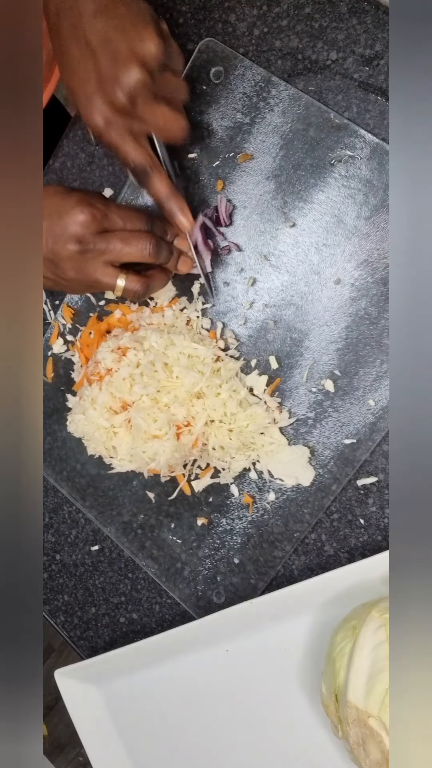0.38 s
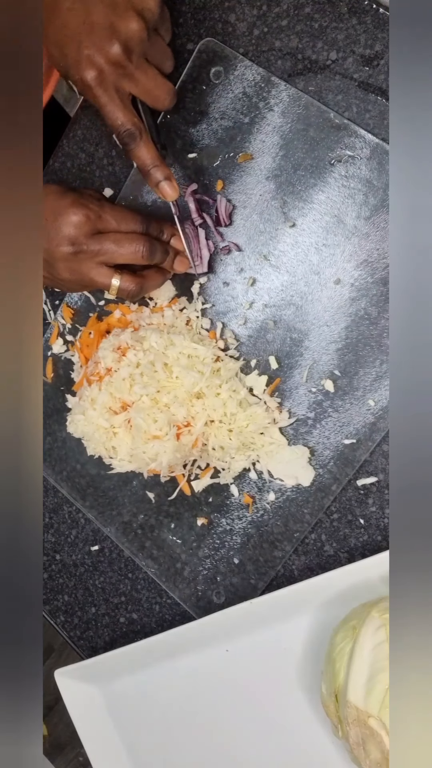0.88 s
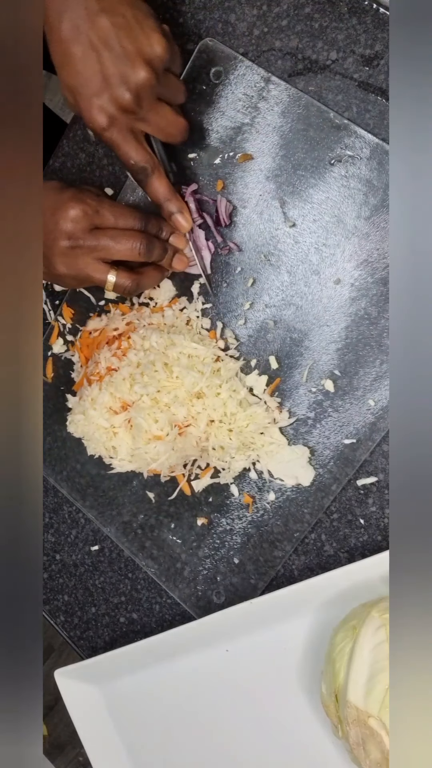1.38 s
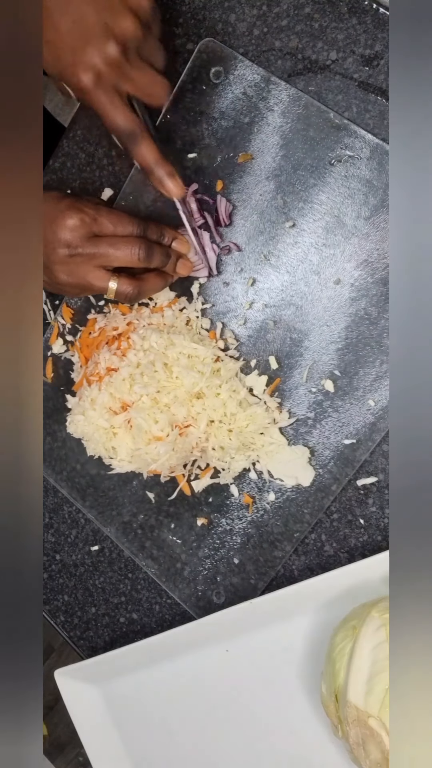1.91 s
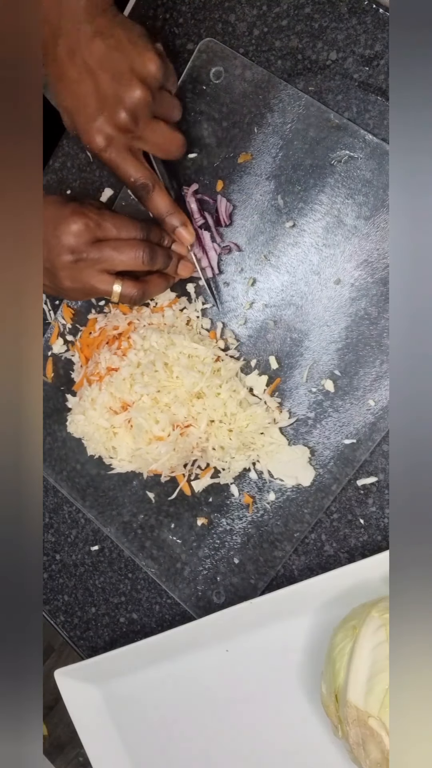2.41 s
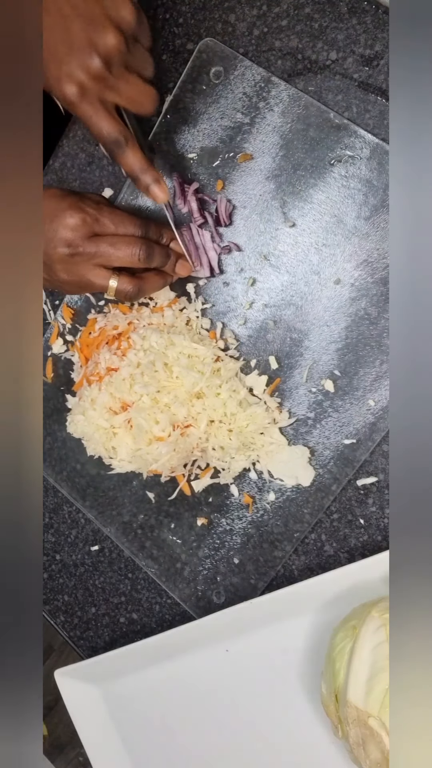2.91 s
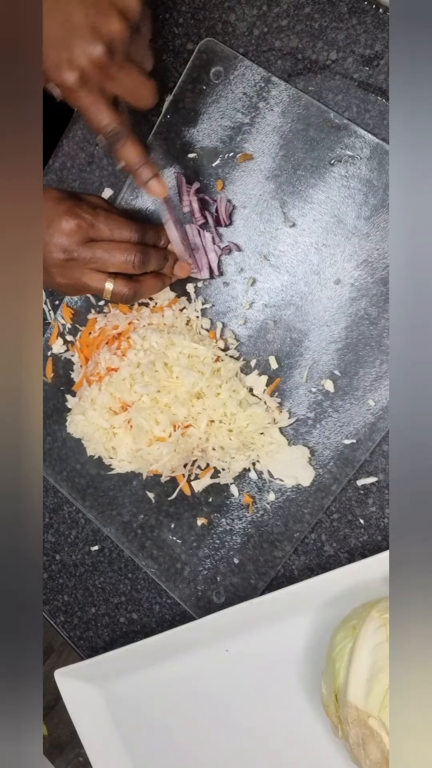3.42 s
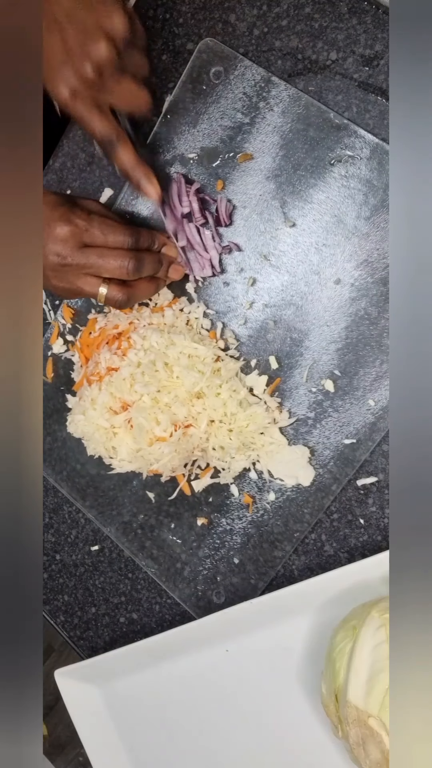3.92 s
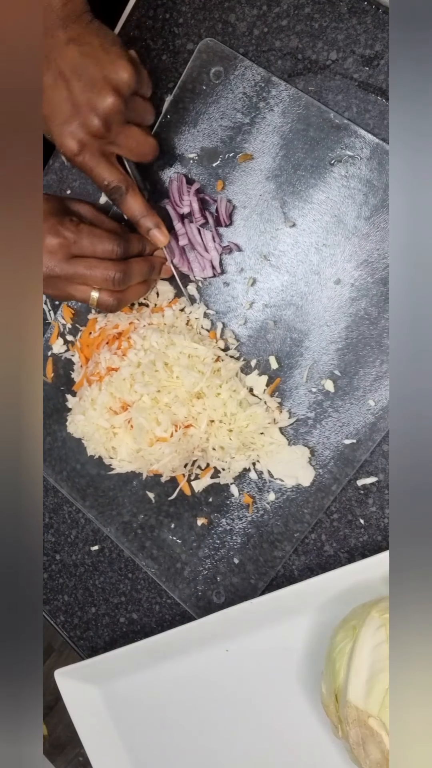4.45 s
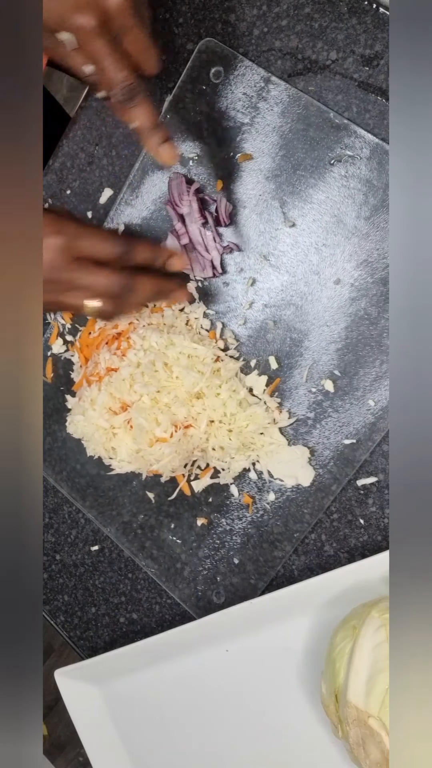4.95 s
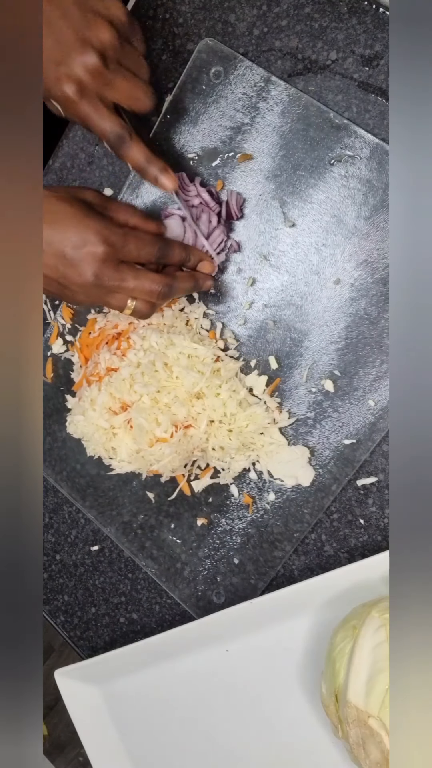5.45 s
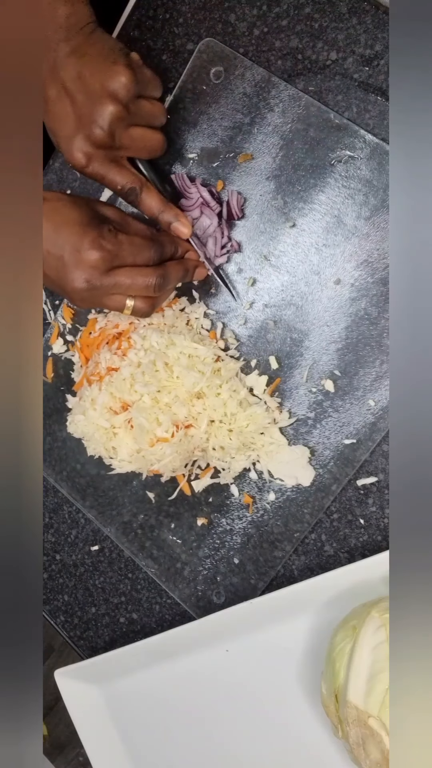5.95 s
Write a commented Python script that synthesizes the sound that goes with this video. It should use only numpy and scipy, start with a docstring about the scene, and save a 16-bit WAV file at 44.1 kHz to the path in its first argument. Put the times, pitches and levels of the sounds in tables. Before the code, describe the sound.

Close, irregular knife knocks and short hissing scrapes ring a glass cutting board over soft booms, with faint steady kitchen air behind.

```python
"""First comes a short gritty scrape over a soft boom, then sharp knocks and more scrapes: a kitchen knife cuts
onion on a glass board lying on a worktop, close under a phone with two microphone ports.
The edge knocks and drags over textured glass: short bursts and random clicks ring the same board modes, with hiss.
Shoves and thuds make the worktop boom below, and one faint thin squeak sounds among the slices.
A small hard kitchen answers with fading noise tails, over faint steady air and appliance noise."""
import sys
import numpy as np
from scipy import signal
from scipy.fft import rfft, irfft
from scipy.io import wavfile
from scipy.ndimage import uniform_filter1d

SR = 44100
rng = np.random.default_rng(int(sys.argv[2]) if len(sys.argv) > 2 else 0)


def elevation(decibels):
    """Turn decibel levels (scalar or array-like) into linear amplitude ratios."""
    levels = np.asarray(decibels, float)
    return 10 ** (levels / 20)


def pcm_store(signal):
    """Save signal as 16-bit PCM."""
    levels = np.round(np.clip(np.atleast_2d(signal), -1, 1) * 32767)
    wavfile.write(sys.argv[1], SR, levels.astype(np.int16).T)


N = 268522
T = np.arange(N) / SR  # time of every sample, s

# The edge slides over the glass or sinks through the onion; levels are drives, before the board and the hiss:
# (full pressure from [s], held [s], low ring [dB], high ring [dB], hiss [dB], best-driven low mode [Hz])
STROKES = [(.01, 0.043, -25.5, -36, -44, 1050), (0.154, 0.015, -44.5, -46, -64, 990),
           (.355, .01, -45, -59, -83, 900), (.373, 0.0091, -41, -48, -70.5, 900),
           (.395, 0.007, -28, -39.5, -40, 918), (.508, 0.019, -28, -35, -43.5, 850),
           (.55, 0.054, -29.5, -40, -49.5, 970), (.718, 0.0067, -42, -42, -63, 1010),
           (.82, 0.032, -68, -75, -69, 1000), (1.088, 0.014, -51, -62, -62.5, 940),
           (1.272, 0.035, -45.5, -52, -58, 1090), (1.354, 0.025, -33, -45, -42.5, 840),
           (1.43, 0.025, -44.5, -49.5, -55, 1000), (1.551, 0.012, -51.5, -53, -62.5, 900),
           (1.584, 0.053, -27.5, -40.5, -46, 920), (1.76, 0.012, -32, -47, -54, 1100),
           (1.778, 0.056, -24, -33.5, -45.5, 1250), (1.925, .01, -39, -53, -67.5, 1140),
           (1.94, 0.0049, -34.5, -35.5, -66, 1090), (2.02, 0.076, -60.5, -78, -79.5, 1160),
           (2.21, 0.0074, -67, -69.5, -69.5, 834), (2.309, 0.036, -57.5, -67, -70, 870),
           (2.43, .01, -54.5, -56.5, -61, 893), (2.467, 0.023, -23, -36, -41, 968),
           (2.608, 0.072, -28.5, -39, -44, 1250), (2.82, .02, -50, -54, -76, 900),
           (3.015, 0.016, -53, -61, -72, 1000), (3.07, 0.048, -56.5, -61, -68.5, 1200),
           (3.13, .01, -42, -51, -60, 1250), (3.147, 0.063, -30.5, -36, -43.5, 1200),
           (3.308, .06, -28, -35, -44, 1060), (3.485, .01, -57, -55.5, -58.5, 1030),
           (3.57, 0.15, -66, -77.5, -71, 960), (3.73, 0.015, -53, -65.5, -62, 850),
           (3.805, 0.013, -26, -36, -41.5, 1370), (3.865, 0.0094, -49, -39, -46.5, 1280),
           (3.965, .01, -38.5, -56, -50.5, 1200), (3.981, 0.018, -29.5, -41.5, -51.5, 1200),
           (4.015, 0.036, -30, -35, -44.5, 1130), (4.167, 0.02, -39, -45, -58, 850),
           (4.26, 0.1, -57, -68.5, -71, 1000), (4.389, 0.085, -59, -60.5, -65, 1260),
           (4.45, 0.015, -45, -55, -57.5, 950), (4.474, 0.037, -28.5, -37.5, -45, 1030),
           (4.651, 0.05, -36.5, -43, -48, 1100), (4.69, 0.038, -35.5, -37.5, -51, 870),
           (4.8, 0.023, -50, -54, -77, 1000), (5.18, .02, -67.5, -84, -93, 876),
           (5.256, 0.022, -74, -79, -70, 870), (5.33, 0.049, -51.5, -65, -82, 820),
           (5.535, 0.021, -57, -78, -75, 1240), (5.645, 0.084, -55.5, -65.5, -71.5, 910),
           (5.718, 0.096, -55.5, -60, -64, 880), (5.819, 0.087, -41, -56, -57.5, 830),
           (5.885, 0.05, -39.5, -45, -46, 870), (5.939, 0.044, -33, -42.5, -54, 1200)]
# The blade meets the glass; levels are drives, before a fixed boost for each:
# (time [s], high ring peak [dB], low ring relative to it [dB], hiss relative to it [dB], contact [ms])
KNOCKS = [(0.16, -31.5, -10.5, -28.5, 3.8), (0.2394, -60.5, 19.5, -30.5, 1.56), (0.2805, -47, 1.5, 3, 7.6),
          (0.3723, -29.5, -0.5, 1, 2.26), (0.408, -11.5, -16, -14.5, 5.9), (0.508, -36, 2.5, -17, 1.9),
          (0.5311, -35.5, 0, -10, 1.8), (0.7178, -33.5, -4, -27, 3.2), (0.8904, -48.5, -11, 0, 6.5),
          (1.0134, -53.5, -10, -7, 4), (1.0994, -68, 10, -6, 3), (1.2211, -46.5, 0, -5, 3.6),
          (1.282, -44, 0.5, 4, 4.6), (1.3538, -35, 5.5, 6, 0.9), (1.3948, -25.5, -12, -16, 2.7),
          (1.779, -43, -21, -27, 0.87), (1.943, -30.5, 0, -30, 2.3), (2.212, -56.5, 5, -7.5, 1.6),
          (2.3068, -53, 2.5, -11, 3.6), (2.4382, -42.5, -3, -19.5, 3.1), (2.4572, -38.5, 2.5, -23.5, 9.2),
          (2.5052, -3.5, -23, -25.5, 1.6), (2.5104, -11, -9, -17.5, 1.64), (2.834, -48.5, 2, -29, 2.3),
          (3.0195, -48, 2, -23, 3.2), (3.1461, -29, -2, -31, 1.1), (3.1728, -28, 0.5, -22, 8.7),
          (3.2066, -20.5, -3, -26, 1.3), (3.4865, -37.5, -0.5, -28, 0.65), (3.6438, -37, -8, 0, 1.97),
          (3.8338, -12.5, -12.5, -23, 1.9), (3.9807, -24, -5.5, -1, 4.8), (4.1667, -38, -16.5, -20, 3.1),
          (4.1873, -32.5, -1.5, -32.5, 3.3), (4.4748, -37.5, 1.5, -13, 1.4), (4.496, -46.5, 4, -11, 2.9),
          (4.5068, -21, -5, -8.5, 3.4), (4.5166, -4.5, -13, -25, 2), (4.6508, -26, -37, -17, 4.9),
          (4.812, -42.5, -3, -28, 7.6), (5.1794, -63, 1.5, -28, 1.5), (5.2487, -60, -9, -2.5, 2.7),
          (5.2892, -61, -4, 8, 2.5), (5.3411, -57, 13.5, -32, 2.7), (5.6294, -54.5, -11.5, -12, 2.5),
          (5.8599, -48, 4, -18, 3), (5.9167, -14.5, -9.5, -4.5, 1.66), (5.9944, -29.5, -7, -35.5, 7)]
# Modes of the glass board, each level relative to the others in its group:
# (frequency [Hz], width [Hz], level [dB], left leads by [radians], left minus right [dB])
BOARD_MODES = [(412, 24, 0, .5, -3), (700, 40, -8, .6, 0), (795, 45, -6, .7, .3), (836, 45, -1.5, .7, .6),
               (905, 55, -7, .9, .3), (1030, 55, -3, 1.1, .1), (1135, 50, -4, 1.3, .1),
               (1200, 50, -4, 1.4, .1), (1325, 60, -1.5, 1.6, .1), (1430, 55, -3, 1.9, .1),
               (1750, 55, -4, 2.2, .1), (1955, 70, -1.5, 2.1, -.4), (2200, 70, -5, 1.8, -.4),
               (2400, 70, -7, 1.5, -.6), (2575, 60, -1.5, 1.2, -.6), (2820, 65, -1.5, 1.1, -1.1),
               (3010, 70, -11, .9, -1.5), (3310, 70, -11, .8, -2.1), (3455, 80, -1.5, .7, -3),
               (3530, 260, -6, .7, -3), (3690, 80, -7, .9, -3), (3810, 80, -9, 1.1, -2.5),
               (4035, 80, -11, 1.4, -1.5), (4310, 80, -14, 1.6, -.6), (4600, 100, -17, 1.9, .3),
               (4940, 120, -2.5, 2.1, .6), (5300, 130, -4, 1.9, .6), (5560, 130, -3, 1.9, .6),
               (5880, 160, -4, 1.8, .5), (6900, 300, -9, 1.8, .5)]
# Borders between the bottom, low, middle, high and top groups of board modes: (frequency [Hz])
GROUP_BORDERS = [550, 1600, 2900, 4750]
# Treble colour of the hiss, before scaling to its level: (frequency [Hz], density [dB per Hz])
HISS_TREBLE = [(2650, -22.5), (4500, -2.5), (5100, -4), (5190, -3.5), (6040, -9.5), (6170, -8), (7180, -11),
               (7770, -12), (9240, -17.5), (12900, -16.5), (15800, -18.5)]
# A hand or the blade shoves the board on the worktop; levels are drives, before the modes:
# (full weight from [s], held [s], boom [dB], upper boom [dB], lowest board mode [dB])
PUSHES = [(.04, 0.05, -37, -47.5, -46), (.17, .02, -48, -62, -68), (.25, .02, -56, -64, -60),
          (.29, 0.018, -37.5, -71, -80), (.39, 0.03, -26.5, -45, -33), (.53, 0.061, -36, -69, -53),
          (.65, 0.06, -46.5, -52, -64), (.82, 0.034, -79, -70, -80), (1.07, 0.075, -60, -61, -73),
          (1.23, 0.019, -50, -67, -73), (1.29, 0.011, -34.5, -62, -64), (1.35, 0.056, -29, -73, -62),
          (1.56, 0.085, -42.5, -47.5, -47), (1.67, 0.041, -38, -45, -70), (1.77, 0.023, -51, -46.5, -64),
          (1.84, 0.027, -59, -59, -52.5), (1.94, .02, -66, -59, -62), (2.23, 0.025, -56, -65, -70),
          (2.31, 0.043, -42, -58.5, -59), (2.47, 0.041, -27.5, -48.5, -35.5), (2.57, 0.16, -41, -57.5, -62),
          (2.71, 0.038, -44, -46.5, -57), (2.79, .03, -61, -70, -75), (3.03, 0.017, -48, -71.5, -62),
          (3.16, 0.032, -32, -61.5, -45), (3.29, .16, -42.5, -57, -44.5), (3.6, 0.025, -61, -78, -85),
          (3.67, 0.019, -42, -77, -62), (3.75, .02, -58.5, -74, -50), (3.82, 0.03, -35.5, -42.5, -38.5),
          (3.99, 0.15, -38, -56, -53), (4.08, 0.092, -42, -69, -69), (4.27, 0.048, -42, -72, -77),
          (4.38, .03, -61, -75.5, -69), (4.5, 0.03, -39, -54.5, -39), (4.65, 0.12, -42, -45.5, -50.5),
          (4.79, 0.045, -51.5, -71, -69), (5.2, 0.061, -52.5, -75.5, -73.5),
          (5.33, 0.05, -53.5, -50, -47.5), (5.41, .03, -57, -63, -83), (5.53, .06, -62, -72, -76),
          (5.63, 0.27, -60, -71, -66), (5.87, 0.076, -41.5, -49, -53), (5.99, 0.051, -43, -45, -59)]
# Modes of the worktop, levels relative to each other: (frequency [Hz], width [Hz], level [dB])
WORKTOP_MODES = [(58, 15, -9.5), (74, 61, 7), (108, 85, 7), (122, 49, -5.5), (195, 38, -22), (250, 43, -46)]
# Fading tail of the room in bands: (centre [Hz], time to fade by 60 dB [s], level [dB])
ROOM_BANDS = [(288, 0.49, -43), (1000, 0.2, -18.5), (3000, 0.35, -17), (8900, 0.49, -12.5)]
# Colour of the background noise, before scaling to its level: (frequency [Hz], density [dB per Hz])
KITCHEN_COLOUR = [(18, -41), (30, -11.5), (77, -1), (271, -8.5), (402, 2.5), (459, -16.5), (883, -6.5),
                  (955, -22.5), (1380, -21), (2330, -28), (2590, -19.5), (5830, -36.5), (15800, -39)]

# How a contact swells and lets go: (rise [dB per s], fall [dB per s], lingering part lower by [dB], its fall [dB per s])
LOW_SHAPE, HIGH_SHAPE, HISS_SHAPE = (547.5, 458, 28.5, 85), (553, 453, 29, 90), (397.5, 245, 23, 75.5)
SKID_SHAPE, SQUEAK_SHAPE = (5001.5, 401.5, 23.5, 146), (102, 112, 32, 102.5)
BOOM_SHAPE, UPPER_SHAPE = (553.5, 300.5, 18.5, 60.5), (500.5, 244.5, 17, 52.5)
LOWEST_SHAPE = (498.5, 398, 26.5, 61)
# Drive of the bottom and middle modes: (level when the low ring is at -45 dB [dB], growth [dB per dB])
BOTTOM_LAW, MIDDLE_LAW = (-69, 0.72), (-55, 0.73)


def unit(x):
    """Scale to rms 1."""
    return x / np.sqrt(np.mean(x ** 2))


def colour(x, points):
    """Shape the spectrum of a noise along (frequency [Hz], level [dB]) points."""
    hz, db = np.transpose(points)
    log_hz = np.log(np.arange(N // 2 + 1) * SR / N + 1)
    return irfft(rfft(x) * elevation(np.interp(log_hz, np.log(hz), db)), N)


def mode(x, hz, width):
    """One resonance as a rotating, fading arrow; gain near 1 at its centre."""
    fade = np.pi * width / SR
    return fade * signal.lfilter([1], [1, -np.exp(2j * np.pi * hz / SR - fade)], x)


def white_rms(modes):
    """What a set of modes gives out for white noise of rms 1."""
    return np.sqrt(sum(elevation(m[2]) ** 2 * np.pi * m[1] / SR / 4 for m in modes))


def wander(rate):
    """Random steps, `rate` of them per second, smoothed into a slow drift."""
    k = int(SR / rate)
    return uniform_filter1d(np.repeat(rng.standard_normal(N // k + 1), k), k)[:N]


def flutter(rate, depth_db):
    """Unsteady hand pressure: a gain that drifts at random."""
    return elevation(depth_db * wander(rate))


def contacts(starts, helds, dbs, shape, faster=1):
    """Level in dB of contacts that swell, hold and let go, quickly at first and then slowly."""
    rise, fall, linger_below_db, linger_fall = shape
    t, power = T[::32], 1e-14  # a coarse time grid is enough
    for start, held, db, speed in np.broadcast(starts, helds, dbs, faster):
        before = np.maximum(start - t, 0)
        after = np.maximum(t - start - held, 0)
        swell = elevation(db - speed * rise * before)
        quick = elevation(-fall * after)
        slow = elevation(-linger_below_db - linger_fall * after)
        power = power + swell ** 2 * (quick ** 2 + slow ** 2)
    return np.interp(T, t, 10 * np.log10(power))


def strokes():
    """Slides of the edge: drives in dB for low ring, high ring and hiss, and the best-driven low mode in Hz."""
    start, held, low, high, fizz, hz = np.transpose(STROKES)
    # a stroke that starts within 5 ms of a knock rises several times faster
    landed = np.abs(start[:, None] - np.array(KNOCKS)[:, 0]).min(axis=1) < .005
    low_db = contacts(start, held, low, LOW_SHAPE, np.where(landed, 7.5, 1))
    high_db = contacts(start, held, high, HIGH_SHAPE, np.where(landed, 5, 1))
    hiss_db = contacts(start, held, fizz, HISS_SHAPE, np.where(landed, 3, 1))
    return low_db, high_db, hiss_db, np.interp(T, start + held / 2, hz)


def grit(share, spread_db):
    """Bumps of the glass texture: random clicks, most small, a few large."""
    clicks = (rng.random(N) < share) * rng.standard_normal(N)
    size = elevation(spread_db * rng.exponential(size=N))
    return unit(clicks * size)


def blows(dbs, stretch=1):
    """Each knock is a sharp tick and a short chatter while the edge settles."""
    out, t = np.zeros(N + 2048), np.arange(2048) / SR
    chatter = rng.standard_normal((len(KNOCKS), 2048))
    for (start, _, _, _, contact_ms), db, noise in zip(KNOCKS, dbs, chatter):
        settle = max(stretch * contact_ms / 1000, 1 / SR)
        burst = noise * np.exp(-t / settle) * (1 - np.exp(-t / (.35 * settle)))
        # the edge lands flat: the tick
        burst[int(.4 * settle * SR)] += 0.96 * np.sqrt(np.sum(burst ** 2))
        i = int(start * SR)
        out[i:i + 2048] += elevation(db) * burst / np.sqrt(np.sum(burst ** 2))
    return out[:N]


def board_forces(low_db, high_db, skid_db, lowest_db, fizz):
    """Rubbing and knocking forces on the bottom, low, middle, high and top groups of board modes."""
    _, peak_db, body_db, _, _ = np.transpose(KNOCKS)
    rub = grit(.08, 2.) * flutter(60, 2.5)
    body, ping = blows(peak_db + body_db + 23.5), blows(peak_db + 16.5)

    def law(at_db, slope):
        """Gain that grows more slowly than the low ring."""
        return elevation(at_db + slope * (low_db + 45))

    bottom = (law(*BOTTOM_LAW) + elevation(lowest_db)) * rub + elevation(-9.5) * body
    low = elevation(low_db) * rub + elevation(6.0) * body
    middle = law(*MIDDLE_LAW) * rub + elevation(-10.5) * ping
    high = np.hypot(elevation(high_db), elevation(skid_db - 22.5)) * rub + ping
    top = elevation(-25.5) * fizz * rub + elevation(-10.0) * ping
    return [bottom, low, middle, high, top]


def board(forces, favoured_hz):
    """The plate's modes reach the two ports with their own phase and balance."""
    modes = np.array(BOARD_MODES)
    groups = np.searchsorted(GROUP_BORDERS, modes[:, 0])
    out = np.zeros((2, N))
    for g, (hz, width, db, lead, pan_db) in zip(groups, BOARD_MODES):
        # the contact point travels over the plate, so each mode is struck now near a node, now near a belly
        force = forces[g] * flutter(14, 3.8) / white_rms(modes[groups == g])
        if g == 1:  # low modes lose 9 dB per octave away from the best-driven one
            force = force * elevation(-9 * np.abs(np.log2(favoured_hz / hz)))
        z = elevation(db) * mode(force, hz, width)
        # away from resonance neighbouring patches of the plate cancel, so the skirts fall steeply
        z = mode(z, hz, 4 * width)
        left = z * np.exp(.5j * lead) * elevation(pan_db / 2)
        right = z * np.exp(-.5j * lead) * elevation(-pan_db / 2)
        out += np.imag([left, right])
    # the plate barely sounds between its two lowest modes
    out = signal.lfilter(*signal.iirnotch(573, 2.5, fs=SR), out)
    return signal.sosfilt(signal.butter(N=3, Wn=360, btype="high", fs=SR, output="sos"), out)


def hiss(level):
    """Broad fizz of steel on wet glass and tearing onion, partly alike at the two ports."""
    points = [(600, -43), (1700, -3.5), (3200, -7.0)] + HISS_TREBLE
    mid, side = (unit(colour(grit(.3, 0.65), points)) * level for _ in range(2))
    return mid + .95 * side * np.array([[1], [-1]])


def squeak():
    """A faint thin squeak among the slices: noise through one narrow resonance, so it wavers."""
    level = elevation(contacts(5.48, 0.043, [-71], SQUEAK_SHAPE))
    return level * unit(mode(rng.standard_normal((2, N)), 2570, 41).imag)  # centre and width in Hz


def pushes():
    """Shoves of the board: drives in dB for the boom, the upper boom and the lowest board mode."""
    start, held, boom, upper, lowest = np.transpose(PUSHES)
    boom_db = contacts(start, held, boom, BOOM_SHAPE)
    upper_db = contacts(start, held, upper, UPPER_SHAPE)
    return boom_db, upper_db, contacts(start, held, lowest, LOWEST_SHAPE)


def rocking():
    """Under a shove the board rocks on its feet: a low swing around 69.7 Hz whose pace wanders."""
    hz = 69.7 * (1 + 0.13 * wander(12))
    return elevation(-24.5) * np.sin(2 * np.pi * np.cumsum(hz) / SR)


def worktop(boom_db, upper_db):
    """Pushes and thuds ring the worktop, whose low modes are nearly alike left and right."""
    start, peak_db, _, _, _ = np.transpose(KNOCKS)
    # signals here are (mid, side) pairs, with little side
    rumble = rng.standard_normal((2, N)) * [[1], [.13]]
    # a knock thuds with the weight behind it, and grows 0.24 dB per dB of its ring
    thud_db = np.interp(start, T, upper_db) + 31 + 0.24 * peak_db
    thud = blows(thud_db, 0.48) * [[1], [.12]]
    deep = elevation(boom_db) * (elevation(-6) * rumble + rocking() * [[1], [.1]]) + thud
    upper = elevation(upper_db + 22.5) * rumble + thud
    boom = 0
    for hz, width, db in WORKTOP_MODES:
        force = deep if hz < 170 else upper
        boom = boom + elevation(db) * mode(mode(force, hz, width), hz, 4 * width).imag
    mid, side = boom / white_rms(WORKTOP_MODES)
    return mid + side * np.array([[1], [-1]])


def room(x):
    """Hard walls: a fading noise tail per band, different at each port."""
    t, tail = T[:SR // 2], 0
    for hz, t60, db in ROOM_BANDS:
        sos = signal.butter(N=2, Wn=[hz / 1.8, hz * 1.8], btype="band", fs=SR, output="sos")
        band = signal.sosfilt(sos, rng.standard_normal((2, len(t))))
        band = band * elevation(-60 * t / t60) * np.clip(t / 0.0037, 0, 1)  # builds up over 3.7 ms
        tail = tail + elevation(db) * band / np.sqrt(np.sum(band ** 2, axis=1, keepdims=True))
    return signal.fftconvolve(x, tail, axes=1)[:, :N]


def kitchen():
    """Faint steady air and appliance noise: coloured noise, partly alike at the two ports."""
    mid, side = unit(colour(rng.standard_normal((2, N)), KITCHEN_COLOUR))
    return elevation(-68) * (mid + 0.69 * side * np.array([[1], [-1]]))


def scene():
    """Strokes and knocks drive the board; hiss, squeak, worktop, room and kitchen noise join."""
    low_db, high_db, hiss_db, favoured_hz = strokes()
    boom_db, upper_db, lowest_db = pushes()
    start, peak_db, _, spit_db, _ = np.transpose(KNOCKS)
    # after each knock the edge skids on
    skid_db = contacts(start, 0.015, peak_db, SKID_SHAPE)
    fizz = np.hypot(elevation(hiss_db), elevation(skid_db - 26))
    forces = board_forces(low_db, high_db, skid_db, lowest_db, fizz)
    # the envelope of each chatter also lets through a spit of hiss
    spit = np.abs(uniform_filter1d(np.abs(blows(peak_db + spit_db + 15.5)), size=128))
    near = board(forces, favoured_hz) + squeak() + hiss(fizz * flutter(45, 2.8) + spit)
    below = worktop(boom_db, upper_db)
    return near + room(near) + below + kitchen()


def roll_off(x):
    """The treble ends steeply here."""
    return signal.sosfilt(signal.butter(12, 16510, fs=SR, output="sos"), x)


def record(dry):
    """The microphones round the loudest knocks and lose the deepest bass and the very top."""
    rounded = 1.222 * np.tanh(dry / 1.376)
    low_cut = signal.butter(N=3, Wn=53.7, btype="high", fs=SR, output="sos")
    top_cut = signal.ellip(8, .2, 60, 16300, fs=SR, output="sos")
    mix = signal.sosfilt(np.vstack([low_cut, top_cut]), rounded)
    return roll_off(mix)


dry = scene()
out = record(dry)
pcm_store(out)
```